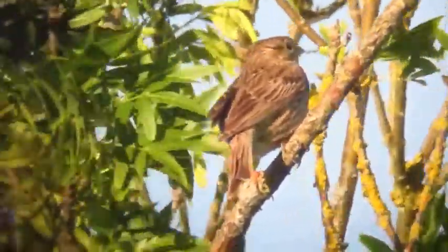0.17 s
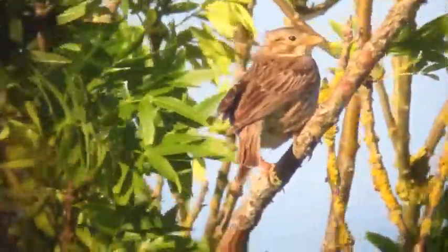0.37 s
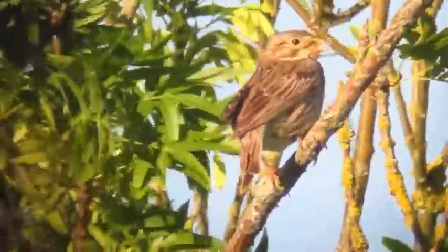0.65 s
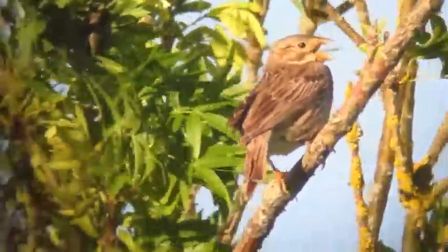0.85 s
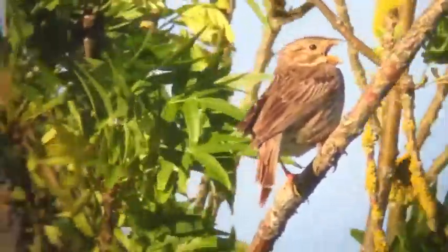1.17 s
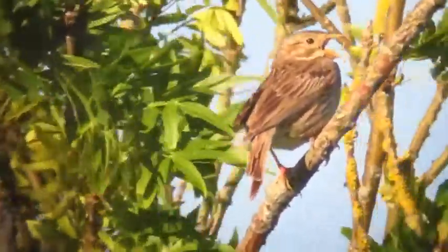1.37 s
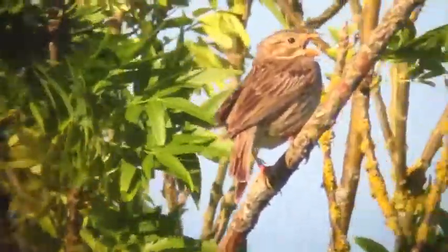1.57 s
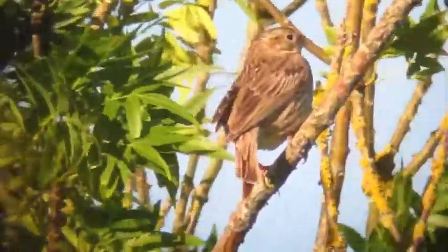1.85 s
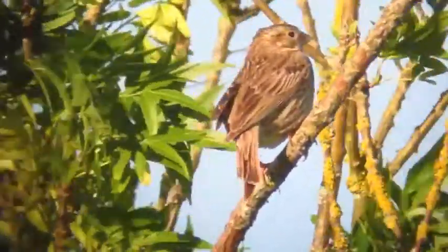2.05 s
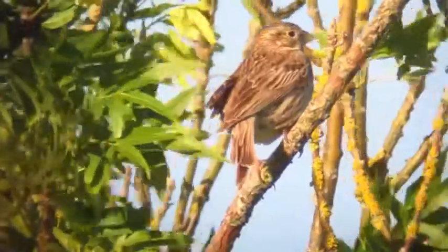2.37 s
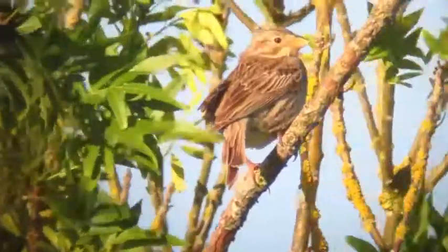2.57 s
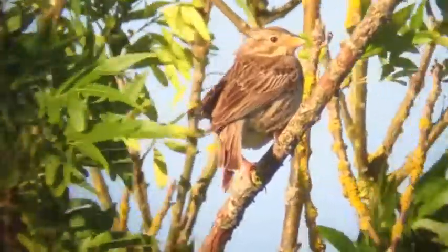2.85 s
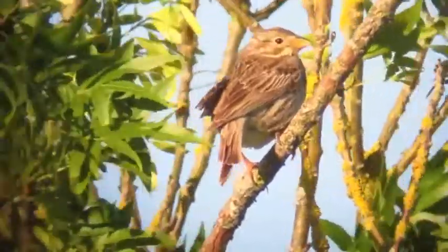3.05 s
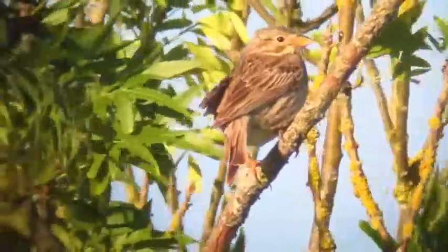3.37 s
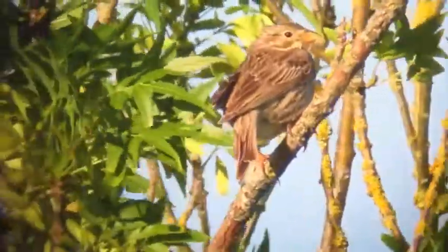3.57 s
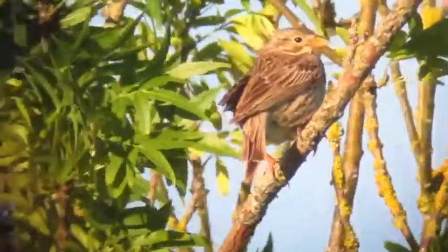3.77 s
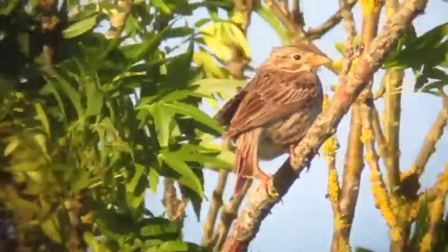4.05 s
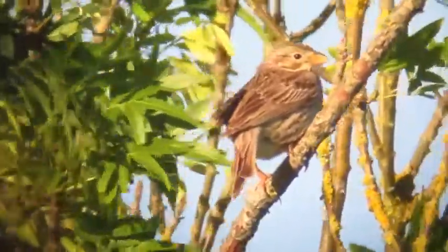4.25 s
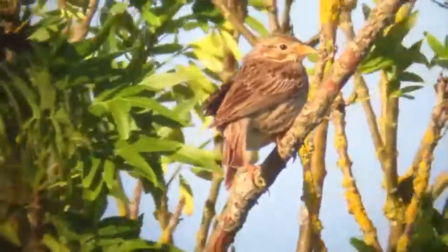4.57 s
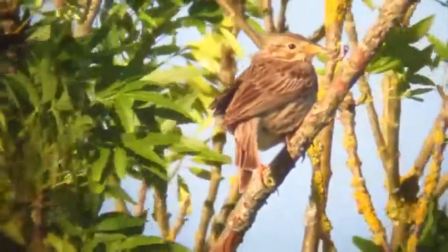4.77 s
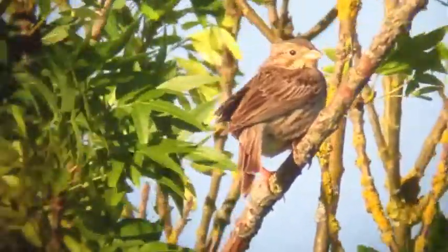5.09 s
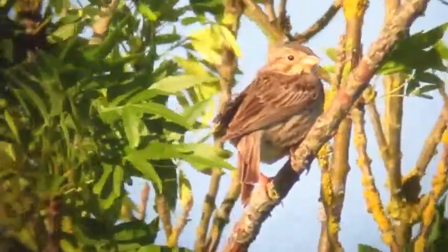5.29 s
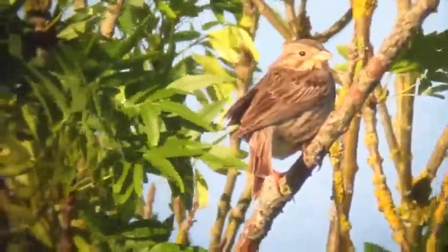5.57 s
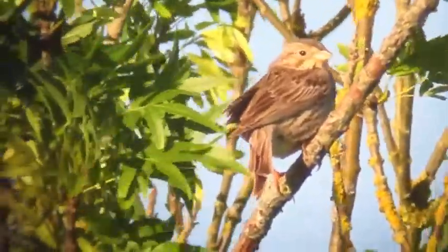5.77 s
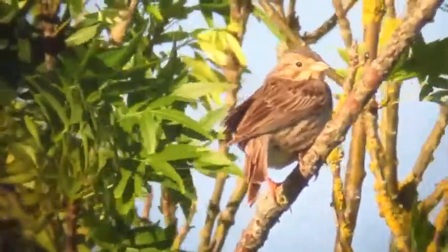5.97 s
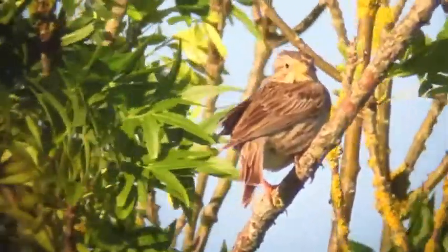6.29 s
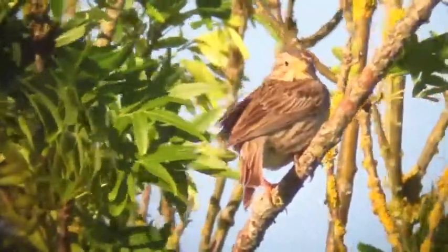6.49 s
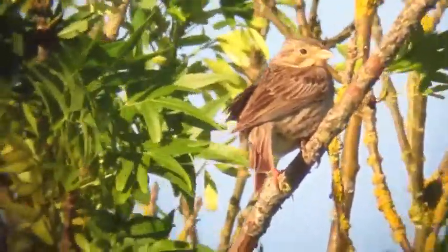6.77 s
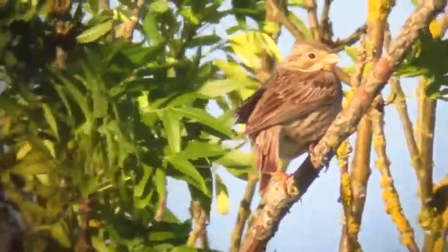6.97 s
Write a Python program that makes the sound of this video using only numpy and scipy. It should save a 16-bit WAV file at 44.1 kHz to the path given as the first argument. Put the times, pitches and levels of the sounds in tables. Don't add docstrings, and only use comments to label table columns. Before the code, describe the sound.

Over low traffic rumble and soft leaf hiss, one small bird jangles briefly, then another sings louder repeated chirping phrases ending in a buzzing flourish.

```python
import sys
import numpy as np
from scipy import signal
from scipy.fft import rfft, irfft, next_fast_len
from scipy.io import wavfile
from scipy.ndimage import uniform_filter1d

SR = 44100
rng = np.random.default_rng(int(sys.argv[2]) if len(sys.argv) > 2 else 0)


def to_wav(s):
    ch = np.atleast_2d(s).T
    pcm = np.round(np.clip(ch, -1, 1) * 32767)
    wavfile.write(sys.argv[1], SR, pcm.astype(np.int16))


def boost(x):
    u = np.asarray(x, float) / 20
    return 10 ** u


N = 314433


def evened(x):
    return x / np.sqrt(np.mean(x ** 2) + 1e-20)


# hz, likeness (0-1), right_lag_rad, left_minus_right_db
PORT_LIKENESS = [(25, 0.5, -1, 3), (60, 0.43, 0, 1), (135, 0.98, 0.23, .5), (350, 0.89, -0.16, .5),
                 (1000, 0.66, .5, 0), (1700, 0.32, 1.17, 2), (3100, 0, 1, 0.7), (4500, 0.3, 3.0, 1),
                 (7840, 0.23, 3, 1.5), (9200, 0.25, 7.5, 1), (12100, 0.21, 3.5, 0.3)]


def noise(spectrum, size, patchy_db, lo_hz, hi_hz):
    frames, hz = 4 * N // size + 5, np.fft.rfftfreq(size, 1 / SR)
    a, b, c, d, patches = rng.standard_normal((frames, len(hz), 5)).T
    patches = uniform_filter1d(patches, size=10, axis=0)
    patches = evened(uniform_filter1d(patches, size=12, axis=1))

    port_hz, *columns = np.transpose(PORT_LIKENESS)
    log_hz = np.log(hz + 1)
    same, lag_rad, pan_db = (np.interp(log_hz, np.log(port_hz), v)[:, None] for v in columns)
    same = np.clip(same, 0, 1)
    left = a + 1j * b
    right = np.exp(-1j * lag_rad) * (same * left + np.sqrt(1 - same ** 2) * (c + 1j * d))

    knot_hz, knot_db = np.transpose(spectrum)
    shape = boost(np.interp(log_hz, np.log(knot_hz + 1), knot_db, left=-90, right=-90))
    in_band = (hz > lo_hz) & (hz < hi_hz)
    band_share = np.linalg.norm(shape[in_band]) / np.linalg.norm(shape)
    shape /= band_share
    z = np.array([left * boost(pan_db / 2), right / boost(pan_db / 2)]) * boost(patchy_db * patches)
    x = signal.istft(z * shape[:, None], nperseg=size, noverlap=3 * size // 4)[1][:, :N]
    return evened(x) / band_share


# hz, density_db
RUMBLE_SPECTRUM = [(12, -37), (20, -17), (54, -1.5), (92, -8), (123, 0.5), (189, -0.5), (252, -8),
                   (321, -4), (362, -12), (626, -12), (756, -15), (977, -17), (1100, -19.5), (1200, -26),
                   (1560, -36), (2640, -120)]
# time_s, level_db
RUMBLE_SWELL = [(0, -43), (2.3, -43.5), (2.8, -42.5), (3.9, -42.5), (4.2, -45), (5.2, -44.5), (7.13, -46.5)]
# hz, density_db
HISS_SPECTRUM = [(700, -31), (1200, -0.5), (1700, -3), (2500, -3.5), (5200, -7), (7200, -10), (8100, -22),
                 (8800, -13), (10200, -11), (13300, -12.5), (15700, -19), (16500, -30)]
# time_s, rise_db
WHEEL_THUDS = [
    (2.92, 2.5),
    (3.49, 3.9),
    (7.04, 3.9),
]


def background():
    t = np.arange(N) / SR
    thud_s = 0.032
    thuds_db = sum(rise_db * np.exp(-((t - s) / thud_s) ** 2) for s, rise_db in WHEEL_THUDS)
    swell = boost(np.interp(t, *np.transpose(RUMBLE_SWELL)) + thuds_db)
    rumble = noise(RUMBLE_SPECTRUM, size=4096, patchy_db=0.2, lo_hz=60, hi_hz=250)
    bass = signal.sosfiltfilt(signal.butter(2, 260, fs=SR, output="sos"), rumble)
    upper = boost(-44.0) * (rumble - bass)
    hiss = boost(-51.0) * noise(HISS_SPECTRUM, size=1024, patchy_db=0.83, lo_hz=1190, hi_hz=15700)
    return boost(-0.46) * swell * bass + upper + hiss


def add(mix, start_s, sound):
    part = mix[..., round(start_s * SR):][..., :sound.shape[-1]]
    part += sound[..., :part.shape[-1]]


def late(x, delay_ms):
    return np.roll(x, round(delay_ms * SR / 1000))


def tone(hz, db, edge_s):
    fade = signal.windows.tukey(len(hz), min(1, 2 * edge_s * SR / len(hz)))
    return boost(db) * fade * np.sin(2 * np.pi * np.cumsum(hz) / SR)


def buzz(hz, db, rate_per_s, swing_hz, depth, jitter, weak_db, edge_s, lead_rad=0.):
    wobble = rng.standard_normal((len(hz), 2))
    uneven, gusts = (evened(uniform_filter1d(w, size=300)) for w in wobble.T)
    turn = 2 * np.pi * np.cumsum(rate_per_s * (1 + jitter * uneven)) / SR
    pulses = 1 - np.clip(depth, 0, 1) * np.cos(turn + lead_rad) ** 2
    level_db = db + weak_db * (1 - np.sin(turn + lead_rad)) / 2 + 2.0 * gusts
    return pulses * tone(hz + swing_hz / 2 * np.sin(turn), level_db, edge_s)


def foliage(x, t60_s, db):
    slots = np.arange(60, SR // 2, 22)
    at = slots + rng.integers(0, 22, (2, len(slots)))
    signs = rng.choice([-1., 1.], at.shape)
    rise = 1 - np.exp(-at / SR / 0.014)
    taps = np.zeros((2, SR // 2 + 22))
    np.put_along_axis(taps, at, signs * boost(-60 * at / SR / t60_s) * rise, 1)
    return boost(db) * signal.fftconvolve(x[None], taps / np.linalg.norm(taps[0]), axes=1)[:, :N]


# start_s, length_s, first_hz, last_hz, level_db
LEFT_WHISTLES = [
    (.928, 0.014, 2520, 1990, -48),
    (6.352, 0.029, 2400, 2000, -52),
    (6.877, 0.069, 2960, 2740, -52),
    (6.94, 0.061, 2750, 2450, -51.5),
    (7.025, 0.042, 2440, 2400, -52),
]
# start_s, length_s, first_hz, last_hz, level_db
RIGHT_WHISTLES = [(2.152, 0.0224, 3250, 2600, -52.5), (2.224, 0.027, 3150, 3220, -50.5),
                  (2.254, 0.049, 3320, 3140, -52), (2.38, 0.024, 2640, 2570, -52.5),
                  (2.487, .025, 2360, 2400, -58), (2.754, 0.026, 3420, 3380, -53),
                  (2.786, .016, 3450, 3050, -53), (2.803, 0.022, 3050, 3550, -53),
                  (2.826, 0.027, 3570, 3800, -59), (2.856, .019, 3700, 2940, -52),
                  (2.957, .05, 3500, 3350, -62), (3.1, 0.038, 3300, 3480, -60),
                  (3.139, 0.052, 3440, 3220, -56), (3.34, .02, 3100, 3200, -56),
                  (3.767, 0.026, 3100, 3020, -53), (3.793, 0.054, 3260, 3100, -51)]


def far_birds():
    out = np.zeros((2, N))
    # whistles, pan (left-right dB), waver (Hz)
    for rows, pan_db, waver_hz in [(LEFT_WHISTLES, 4, 200), (RIGHT_WHISTLES, -11, 45)]:
        pan = boost([[pan_db / 2], [-pan_db / 2]])
        for start_s, length_s, first_hz, last_hz, db in rows:
            hz = np.linspace(first_hz, last_hz, round(length_s * SR))
            whistle = buzz(hz, db, 45.6, waver_hz, depth=0.2, jitter=0.4, weak_db=0.5, edge_s=0.0047)
            add(out, start_s, pan * whistle)
    return np.array([out[0], late(out[1], -.06)]) + foliage(out.mean(0), t60_s=.25, db=-6.5)


def beats(first_s, gap_s, quicken_s, first_db, last_db, count):
    k = np.arange(count)
    times_s = first_s + gap_s * k - quicken_s * k * (k - 1) / 2
    levels_db = first_db + (last_db - first_db) * (k / (count - 1)) ** 0.67
    return np.transpose([times_s, levels_db])


def phrase(mix, strokes, rows):
    tunings = 1 + 0.0054 * rng.standard_normal(len(rows))
    for (beat_s, db), tuning in zip(rows, tunings):
        for stroke in strokes:
            ms, hz, shape_db = np.transpose(stroke)
            t_ms = np.arange(ms[0], ms[-1], 1000 / SR)
            uneven_db = 1.4 * rng.standard_normal(len(ms))
            level_db = db + np.interp(t_ms, ms, shape_db + uneven_db)
            glide = tone(tuning * np.interp(t_ms, ms, hz), level_db, 0.00067)
            add(mix, beat_s + ms[0] / 1000, glide)


# start_s, length_s, pitch_hz, level_db, swing_hz
RATTLE_NOTES = [
    (1.008, .127, 6380, -44, -900),
    (1.156, .08, 5380, -41, -800),
    (1.362, .048, 5680, -39, -1500),
    (1.15, .055, 6300, -46, -900),
]
# start_s, length_s, pitch_hz, level_db
JANGLE_NOTES = [(1.015, 0.25, 5350, -51), (1.052, 0.084, 7150, -49), (1.139, 0.042, 4380, -42),
                (1.20, .035, 7050, -48), (1.235, 0.022, 7400, -37), (1.304, 0.012, 7500, -35),
                (1.338, .016, 4180, -48), (1.367, 0.038, 7320, -39.5), (1.421, 0.013, 4250, -38),
                (1.448, 0.013, 7350, -40), (1.479, .016, 7500, -43), (1.505, 0.014, 7400, -42),
                (1.538, .008, 5970, -44), (1.561, .022, 4400, -47), (1.6, 0.099, 7300, -43.5),
                (1.622, .03, 4500, -43), (1.648, 0.031, 4600, -43), (1.678, .016, 4550, -46),
                (1.69, .02, 4750, -41), (1.16, .026, 5400, -41), (1.75, .012, 4800, -52),
                (1.796, 0.013, 4500, -47), (1.819, .017, 7250, -43), (1.87, .014, 3530, -52)]
# from_beat_ms, pitch_hz, level_db
TICK_STROKES = [
    [(-1.5, 7500, 6), (0, 6250, 1), (2.4, 4300, 4)],
]
# first_s, gap_s, quicken_s, first_db, last_db, count
TICK_RUNS = [
    dict(first_s=1.014, gap_s=0.016, quicken_s=0., first_db=-54, last_db=-49, count=11),
    dict(first_s=1.241, gap_s=0.012, quicken_s=0., first_db=-48, last_db=-45, count=1.8),
    dict(first_s=1.626, gap_s=.0121, quicken_s=0., first_db=-48, last_db=-47, count=6),
    dict(first_s=1.297, gap_s=.27, quicken_s=0., first_db=-46, last_db=-50, count=2),
]
# from_beat_ms, pitch_hz, level_db
CHIRP_STROKES = [
    [(-5, 7900, -13), (-2, 6700, -7), (1, 6330, 3.5), (2.5, 5700, -1), (6, 4900, -5)],
]
# time_s, peak_db
CHIRP_BEATS = [(1.322, -39.5), (1.356, -40), (1.413, -42), (1.444, -41.5), (1.471, -37.5), (1.498, -39.5),
               (1.525, -38), (1.589, -38.5)]
# from_beat_ms, pitch_hz, level_db
LONG_CHIRP_STROKES = [
    [(-9.5, 7700, -5), (-2, 6750, -9), (2, 6200, 2.5), (4.5, 5400, -3.5), (9.5, 4600, -7)],
]
# time_s, peak_db
LONG_CHIRP_BEATS = [(1.722, -41), (1.749, -41.5), (1.777, -41), (1.846, -41.5), (1.876, -45.5),
                    (1.906, -48), (2.000, -55)]


def bunting():
    song = np.zeros(N)
    phrase(song, CHIRP_STROKES, CHIRP_BEATS)
    phrase(song, LONG_CHIRP_STROKES, LONG_CHIRP_BEATS)
    for run in TICK_RUNS:
        phrase(song, TICK_STROKES, beats(**run))
    notes = [(*row, 140) for row in RATTLE_NOTES]
    notes += [(*row, -380, 95) for row in JANGLE_NOTES]
    for start_s, length_s, pitch_hz, db, swing_hz, rate_per_s in notes:
        hz = np.full(round(length_s * SR), pitch_hz)
        add(song, start_s, buzz(hz, db, rate_per_s, swing_hz, depth=0.85, jitter=0.15, weak_db=-12,
                                edge_s=0.004, lead_rad=np.pi / 2))
    left = late(song, 0.18) + boost(-3.0) * late(song, 3.9)
    right = song + boost(-4.5) * late(song, 4.2)
    return np.array([boost(-2.5) * left, boost(.6) * right]) + foliage(song, t60_s=.11, db=-6)


# from_beat_ms, pitch_hz, level_db
BLIP_STROKES = [
    [(-3.5, 5600, 6), (0.5, 5200, 1.5), (3.5, 4630, -4)],
    [(0, 4840, -4), (7, 4770, -6)],
]
HIGH_STROKES = [
    [(-8.5, 5300, -6), (-0.5, 4900, -5), (2, 4700, 1), (7, 4700, -8)],
    [(9, 4700, -7), (11, 5300, 4.5), (13, 4300, -7), (14.5, 3630, 0), (16.5, 2800, -7)],
]
CROWN_STROKES = [
    [(-43, 7250, -11), (-36.5, 6300, -3), (-32.5, 5600, -7), (-24.5, 5900, -5), (-16, 6000, -10),
     (-10, 8500, -17)],
]


def high_phrase(song):
    phrase(song, BLIP_STROKES, beats(first_s=2.905, gap_s=0.074, quicken_s=0.,
                                     first_db=-53, last_db=-50.5, count=4))
    phrase(song, HIGH_STROKES, beats(first_s=3.139, gap_s=.1415, quicken_s=0.00067,
                                     first_db=-57, last_db=-41.5, count=5.5))
    phrase(song, CROWN_STROKES, beats(first_s=3.421, gap_s=.1403, quicken_s=0.00048,
                                      first_db=-52, last_db=-41, count=3.6))


# from_beat_ms, pitch_hz, level_db
FLICK_STROKES = [
    [(-29.5, 5970, -19), (-28, 5170, -11), (-25, 4350, -12)],
    [(-28, 4180, -13), (-25.5, 3480, -9), (-23.5, 3590, -8.5), (-19.5, 4470, -6)],
]
MIDDLE_STROKES = [
    [(50.2, 3500, -21), (54.9, 3180, -10), (58.6, 3200, -12), (63, 3000, -23)],
    [(-5.5, 4450, -13), (-1.5, 4150, -8.5), (1.5, 3700, 2), (5.5, 3150, -4), (10.5, 2620, -9.5),
     (13.5, 2650, -13.5), (19.5, 2880, 2), (24, 3130, -8.5), (29, 3200, -4), (34.5, 3080, -11)],
]
# time_s, level_db
MIDDLE_BEATS = [(3.947, -34.5), (4.052, -33), (4.156, -32.5), (4.263, -32), (4.366, -30), (4.469, -30),
                (4.571, -29.5), (4.673, -29), (4.776, -28.5)]


def middle_phrase(song):
    phrase(song, FLICK_STROKES, MIDDLE_BEATS)
    phrase(song, FLICK_STROKES, [(4.879, -34)])
    phrase(song, MIDDLE_STROKES, MIDDLE_BEATS)


# from_beat_ms, pitch_hz, level_db
LOW_STROKES = [
    [(-10, 4300, -12), (-8.5, 3720, -3.5), (-6, 3310, -15), (-5, 2840, -2.5), (-2.5, 3150, -9.5),
     (2, 3470, 3.5), (5, 3820, -10.5), (8, 3450, -5.5), (10, 3350, -12)],
    [(7.53, 3230, -21), (9.7, 2860, 0.5), (12.4, 2650, -7.5), (15, 2485, -3), (18.5, 2386, 2.5),
     (20.3, 2140, -9.5), (24.1, 1770, -14), (27.8, 1200, -25)],
]
# time_s, level_db
LOW_BEATS = [(4.8588, -31), (4.927, -31), (4.995, -31.5), (5.062, -30.5), (5.129, -30.5), (5.1978, -29.5),
             (5.2661, -29.5), (5.3359, -30)]


def low_phrase(song):
    phrase(song, LOW_STROKES, LOW_BEATS)


VOICE = dict(jitter=0.22, edge_s=0.0037, lead_rad=1.48)
DEPTH, WEAK_DB, RASP_PER_S = 0.62, -1, 158

# time_s, pitch_hz, level_db
RASP_CONTOUR = [
    (5.42, 5220, -44),
    (5.432, 5300, -34),
    (5.446, 5230, -31.5),
    (5.456, 4880, -41),
    (5.463, 4100, -41),
    (5.476, 4580, -41),
]


def rasp(song):
    s, hz, db = np.transpose(RASP_CONTOUR)
    t = np.arange(s[0], s[-1], 1 / SR)
    u = (t - s[0]) / (s[-1] - s[0])
    swing_hz = np.interp(u, (0, 1), (756, 1400))
    add(song, s[0], buzz(np.interp(t, s, hz), np.interp(t, s, db), RASP_PER_S, swing_hz,
                         DEPTH, weak_db=WEAK_DB, **VOICE))


# start_s, length_s, pitch_hz, level_db, swings_per_s
WIDE_BUZZES = [
    (5.46, 0.033, 5500, -43, 160),
    (5.535, 0.048, 4900, -41, 160),
    (5.612, 0.05, 5100, -42, 140),
    (5.52, .035, 7600, -48, 150),
]
NARROW_BUZZES = [
    (5.425, .035, 5700, -45, 158),
    (5.54, 0.025, 3800, -38, 110),
    (5.564, 0.023, 3850, -32.5, 120),
    (6.1, .016, 3400, -44, 140),
]


def second_voice(song):
    # buzzes, swing (Hz), share of the pitch lost
    for rows, swing_hz, sag in [(WIDE_BUZZES, 1250, 0.066), (NARROW_BUZZES, 300, .01)]:
        for start_s, length_s, hz, db, rate_per_s in rows:
            u = np.linspace(0, 1, round(length_s * SR))
            add(song, start_s, buzz(hz * (1 - sag * u), db - 10 * u, rate_per_s, swing_hz,
                                    DEPTH, weak_db=WEAK_DB, **VOICE))


# from_beat_ms, pitch_hz, level_db
TURN_STROKES = [
    [(79.6, 5900, -13), (84, 4600, -10)],
    [(83.6, 3950, -6), (88.2, 3650, -1), (95, 3330, -4.5), (99.7, 2850, -11), (103, 2300, -11)],
    [(106.3, 3200, -7), (109.1, 4000, -2), (112, 3800, -5), (117, 3900, -3), (119, 3300, -10)],
    [(119, 5000, -13), (121, 5700, -17)],
    [(124.6, 7300, -24), (129, 5600, -16), (132, 4700, -5), (136, 6500, -11), (138.5, 3300, -11),
     (145, 2300, -24)],
    [(203, 2150, -24), (208, 2470, -17), (208, 3050, -28), (214, 3550, -11), (215, 4000, -16)],
    [(206, 4900, -17), (206, 5600, -16), (211, 7400, -22)],
]


def turning_strokes(song):
    phrase(song, TURN_STROKES, [(5.400, -26)])


# time_s, pitch_hz, level_db
WHEEZE_CONTOUR = [
    (5.614, 3810, -37),
    (5.63, 3450, -45),
    (5.646, 3240, -32.5),
    (5.69, 2990, -30.5),
    (5.735, 2523, -30),
    (5.764, 2276, -34),
    (5.80, 2156, -33),
    (5.855, 2070, -49),
]


def wheeze(song):
    s, hz, db = np.transpose(WHEEZE_CONTOUR)
    t = np.arange(s[0], s[-1], 1 / SR)
    u = (t - s[0]) / (s[-1] - s[0])
    tires_s = (5.745, 5.765)
    rate_per_s = np.interp(t, (*tires_s, s[-1]), (160, 105, 92))
    depth = np.interp(t, tires_s, (DEPTH, .95))
    weak_db = np.interp(t, tires_s, (WEAK_DB, -16))
    swing_hz = np.interp(u, (0, 0.16), (400, 960)) * np.interp(t, tires_s, (1, .8))
    add(song, s[0], buzz(np.interp(t, s, hz), np.interp(t, s, db), rate_per_s, swing_hz,
                         depth, weak_db=weak_db, **VOICE))


def drift():
    per_s = 6
    knots = rng.standard_normal(N * per_s // SR + 2)
    return evened(np.interp(np.arange(N) * per_s / SR, np.arange(len(knots)), knots))


# hz, left_db, right_db
PORT_COLOUR = [(1800, -4.5, -0.5), (2400, -3, 2.5), (2860, 0.5, -0.5), (3200, 0, -5), (3500, 1, 1.5),
               (3720, 2, -3), (4400, 2.5, -2), (5600, 0, 0)]
# time_s, left_minus_right_db
HEAD_TURNS = [
    (4.84, 1),
    (4.86, 0),
    (5.39, -1.5),
    (5.42, -1),
]


def ports(x):
    knot_hz, *port_db = np.transpose(PORT_COLOUR)
    size = next_fast_len(N)
    hz = np.fft.rfftfreq(size, 1 / SR)
    colour = boost([np.interp(hz, knot_hz, db) for db in port_db])
    pan_db = np.interp(np.arange(N) / SR, *np.transpose(HEAD_TURNS))
    return irfft(rfft(x, size) * colour, size)[:, :N] * boost([pan_db / 2, -pan_db / 2])


# delay_ms, favoured_hz, width_hz, left_db, right_db
ECHOES = [(4.23, 2900, 2800, -34, -6), (10.43, 5000, 2300, -11, -19), (21, 3450, 520, 0, -15),
          (5.1, 3160, 830, -7, -11), (1.906, 3300, 1400, -15, -14), (22.3, 2620, 390, -7.5, -7),
          (29.8, 3470, 850, -5, -14), (44.3, 4400, 1000, -11, -26), (7.55, 4600, 500, 0, -4),
          (24.6, 3700, 260, -17, -11), (31.7, 4200, 520, -4, -4), (44.7, 4100, 520, -8, -13)]


def finch():
    song = np.zeros(N)
    for part in (high_phrase, middle_phrase, low_phrase, rasp, second_voice, turning_strokes, wheeze):
        part(song)

    leafy = signal.lfilter(*signal.iirpeak(4000, 2.2, SR), song)
    leafy = leafy + boost(10.0) * signal.lfilter(*signal.iirpeak(4430, 14.0, SR), song)
    softened = signal.sosfiltfilt(signal.butter(6, 4800, fs=SR, output="sos"), leafy)
    leafy = .55 * softened + .45 * leafy

    rustle_s = .35
    turn = np.pi / 2 * np.arange(N) / SR / rustle_s
    out = ports(np.array([boost(1.5) * song, boost(1.65) * late(song, .05)]))
    out += foliage(np.cos(turn) * leafy, t60_s=.19, db=-2.0)
    out += foliage(np.sin(turn) * leafy, t60_s=.19, db=-1.5)

    drift_db = 1.8
    for delay_ms, hz, width_hz, left_db, right_db in ECHOES:
        echo = signal.lfilter(*signal.iirpeak(hz, hz / width_hz, SR), late(song, delay_ms))
        left = boost(left_db + drift_db * drift()) * echo
        right = boost(right_db + drift_db * drift()) * late(echo, .11)
        out += np.array([left, right])
    return out


def scene():
    return background() + far_birds() + bunting() + finch()


# hz, margin (in units of block-to-block chance)
BLOCK_MARGIN = [(4000, 5), (5000, 3.4), (6400, 3), (7000, 2.3), (7600, 1.6), (7900, -1), (8150, -3),
                (8400, -.5), (8800, 1.8), (9500, 2.9), (12500, 2.6), (13500, 1.7), (13900, .3),
                (15000, -.3), (15800, -.3)]


def drop_weak_blocks(x):
    hz, t, z = signal.stft([x[0] + x[1], x[0] - x[1]], SR, nperseg=1024, noverlap=768)
    chance = rng.standard_normal((len(t) // 4 + 1, len(hz) // 6 + 1, 2)).T
    slow = evened(uniform_filter1d(rng.standard_normal(chance.shape[2]), size=5))
    chance = .85 * evened(uniform_filter1d(chance, size=2, axis=2)) + .45 * slow
    chance = np.repeat(np.repeat(chance, 6, axis=1), 4, axis=2)[:, :len(hz), :len(t)]

    song_power = (abs(z[0, hz > 3000]) ** 2).sum(0)
    song_db = 10 * np.log10(uniform_filter1d(song_power, size=12))
    loud = np.clip((song_db - np.median(song_db)) / 5, 0, 1.15)
    block_hz = hz[np.arange(len(hz)) // 6 * 6]
    margin = np.interp(block_hz, *np.transpose(BLOCK_MARGIN), left=9)[:, None]
    z *= np.where(margin + chance - loud < 0, boost(-60), 1)
    z[1, hz > 15000] = 0
    mid, side = signal.istft(z, SR, nperseg=1024, noverlap=768)[1][:, :N] / 2
    return np.array([mid + side, mid - side])


def band_limit(x):
    return signal.sosfilt(signal.butter(12, 15770, fs=SR, output="sos"), x)


def record(dry):
    mix = drop_weak_blocks(dry)
    return band_limit(mix)


dry = scene()
out = record(dry)
to_wav(out)
```